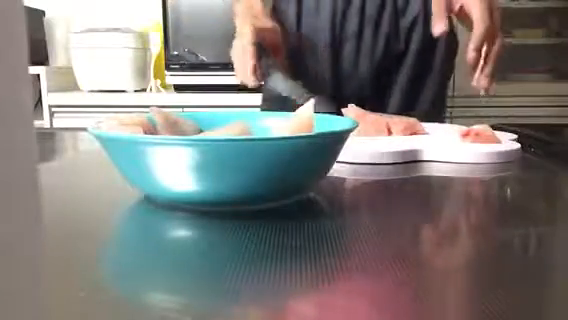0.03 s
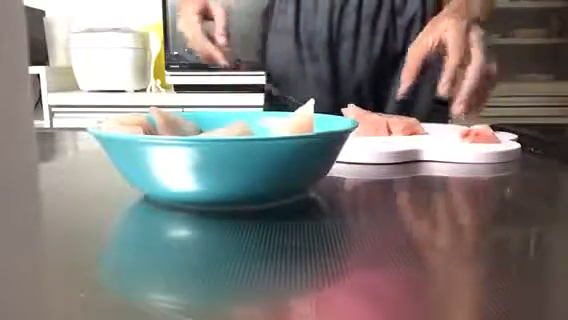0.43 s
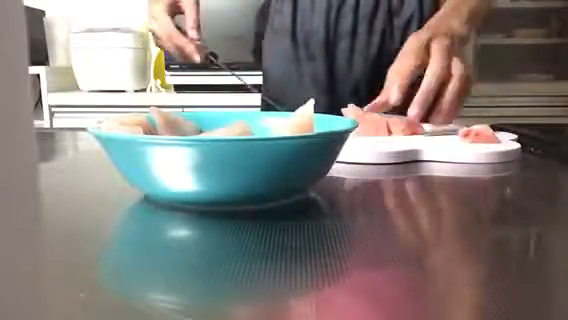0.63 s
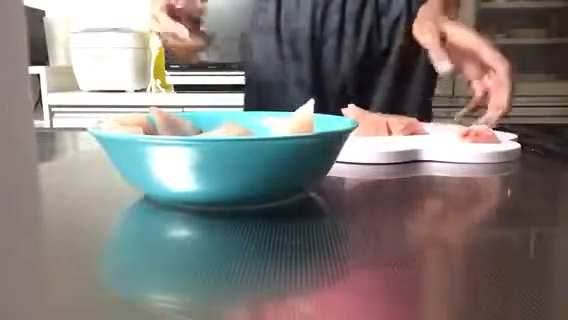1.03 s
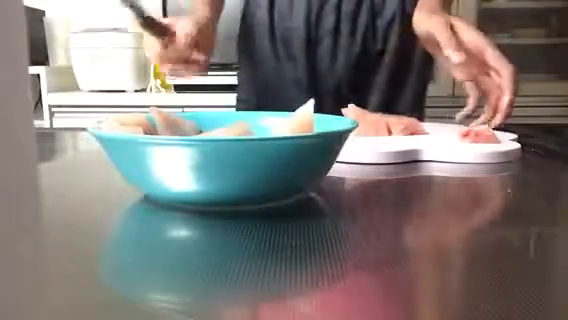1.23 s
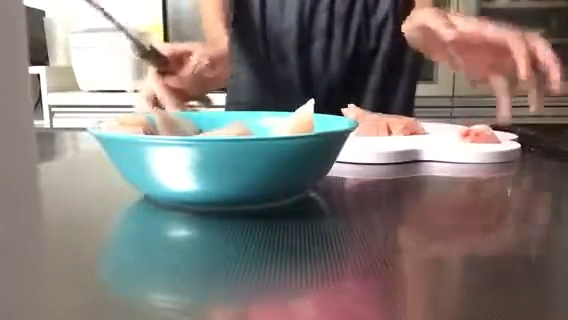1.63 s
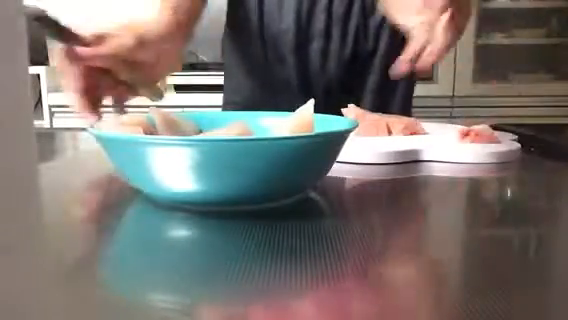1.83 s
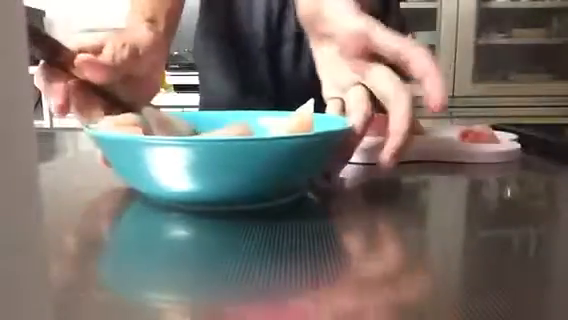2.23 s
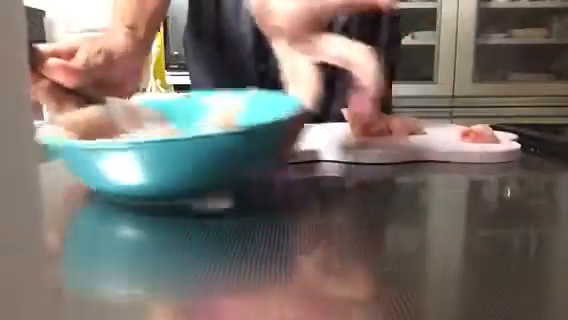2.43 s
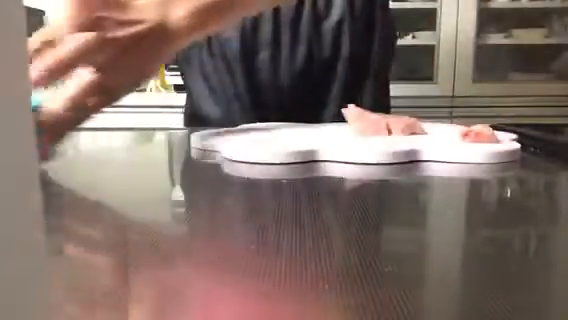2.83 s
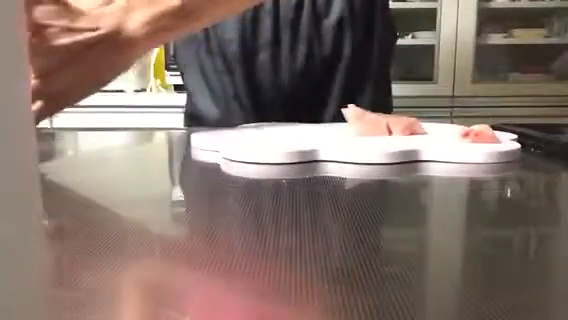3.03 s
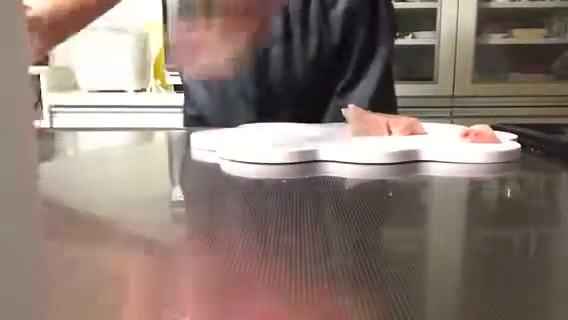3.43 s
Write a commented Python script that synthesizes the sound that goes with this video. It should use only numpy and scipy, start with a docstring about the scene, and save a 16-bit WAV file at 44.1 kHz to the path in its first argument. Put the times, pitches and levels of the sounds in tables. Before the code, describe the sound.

A bowl dragged across a kitchen counter is the main sound, heard close. At 0.1 seconds a knife clacks on a cutting board, ringing over a thud, then taps lightly at 0.6. Faint hand rustles follow, with a soft knock at 1.6. The bowl knocks at 2.4, then grinds, rumbles and groans along until a bump at 3.2. An appliance hums faintly throughout.

```python
"""Close on a kitchen counter, in a small hard room with an appliance humming behind.
A knife clacks down on a cutting board, its steel ringing over a thud, then the tip taps lightly.
Hands rustle and knock about softly. A filled bowl is gripped and dragged: its foot sticks and slips,
grinding and groaning while the counter drones underneath. Last, the bowl is set down with a bump."""
import sys
import numpy as np
from scipy import signal
from scipy.fft import rfft, irfft, next_fast_len
from scipy.io import wavfile
from scipy.ndimage import uniform_filter1d

SR = 44100
rng = np.random.default_rng(int(sys.argv[2]) if len(sys.argv) > 2 else 0)


def dump_mix(stems):
    """Bounce the given channels to the path in sys.argv[1] as a 16-bit WAV at rate SR."""
    frames = np.atleast_2d(stems).T  # one column per channel
    limited = np.clip(frames, -1, 1)  # hard clip at full scale
    pcm = np.round(limited * 32767).astype(np.int16)
    wavfile.write(sys.argv[1], SR, pcm)


N = 154350
TIME = np.arange(N) / SR

# fader curves of the drag's four layers, ahead of their trims: t/s, level/dB
GRIND_FADER = [(2.3, -75), (2.384, -59.5), (2.448, -55), (2.476, -45), (2.534, -48.5), (2.554, -39),
               (2.608, -48.5), (2.63, -41), (2.674, -48.5), (2.772, -40.5), (2.78, -41.5), (2.926, -48.5),
               (3.01, -43.5), (3.18, -59)]
DRONE_FADER = [(2.3, -64), (2.44, -42), (2.47, -38), (2.59, -42), (2.68, -36.5), (2.87, -41.5),
               (2.95, -36.5), (3.04, -34.5), (3.11, -37), (3.17, -54.5)]
RUMBLE_FADER = [(2.3, -58), (2.45, -56), (2.52, -39.5), (2.6, -34.5), (2.69, -37.5), (2.73, -63),
                (2.85, -50), (3.18, -66)]
GRIT_FADER = [(2.33, -93), (2.37, -67), (2.382, -54), (2.426, -59.5), (2.632, -59), (2.708, -41.5),
              (2.92, -49.5), (2.978, -57.5), (3.11, -60), (3.146, -56), (3.18, -55)]
# the bowl's foot catches in rasps and thin squeaks: t/s, length/s, relative level/dB
RASPS = [(2.5, 0.069, -55), (2.645, .04, -43), (2.715, .03, -40), (2.765, 0.034, -32.5),
         (3.005, 0.011, -38.5)]
SQUEAKS = [(2.55, 0.018, -67), (2.575, 0.0073, -50), (2.61, 0.01, -55)]
# the foot groans: t/s, length/s, f/Hz, level/dB
GROANS = [(2.69, .09, 222, -35), (2.76, .07, 440, -43), (2.82, .07, 530, -41), (2.945, .07, 560, -39),
          (3.04, .055, 316, -30)]
# echo from the counter's edge as the bowl travels: t/s, delay/s
EDGE_DELAY = [(2.45, .015), (2.66, .0082), (2.8, 0.0086), (2.93, .0124), (3.15, 0.017)]
# resonances of bowl, counter slab, squeaking foot and cutting board: f/Hz, width/Hz, gain/dB
BOWL_BODY = [(750, 50, -3), (914, 30, 0), (1160, 70, -8), (1352, 48, 4), (1572, 70, -2), (1777, 22, 1),
             (1935, 18, -5), (2130, 50, -13), (2660, 15, -10), (2858, 18, -11), (4477, 14, -16),
             (5340, 14, -15)]
SLAB_BODY = [(238.4, 53.4, -2), (308, 92.3, -1.5), (405, 96, -5.5), (546, 105, -8.5)]
SQUEAK_PEAK = [(6540, 120, 0)]
BOARD_BODY = [(587, 60, 0), (740, 70, -5.5), (1050, 180, -0.5), (1510, 210, -7)]
# hits of blade, knife tip, jolted board and small things touching: t/s, level/dB
BLADE_CLACKS = [(.131, -34.5), (.1365, -38), (.143, -57)]
TIP_TAPS = [(.575, -52.5), (.603, -55), (.655, -66.5)]
BOARD_JOLTS = [(.133, -44), (.15, -48), (.174, -48)]
TICKS = [(1.633, -52), (3.188, -53)]
# ring of the blade, the blade with its tip on the board, and the counter: f/Hz, gain/dB, t60/s
BLADE_MODES = [(2140, 1, .1), (2790, -2, .12), (3480, -2, .23), (4930, 2, .24), (6050, -4, .22),
               (6780, -2, .13), (7630, -4, .21), (8850, 0, .23), (10380, -2, .22), (11250, -3, .2),
               (11980, 1, .23), (13720, 3, .17), (15470, 1, .19)]
TIP_MODES = [(740, -3, .22), (1098, 2, .22), (1502, -3, .28), (2000, -6, .22), (2620, -1, .24),
             (3280, -3, .22), (4016, -1, .22), (4700, -1, .24), (5700, -1, .24), (6680, -1, .19),
             (7400, -3, .2), (8250, -3, .27), (9560, -2, .22), (11400, -4, .27), (12880, -3, .24)]
COUNTER_MODES = [(57.6, -23.5, .33), (105.7, -10, 0.21), (241, -15, 0.18), (333.3, -22.5, 0.14),
                 (603.5, -18.5, 0.05)]
# knocks on the counter: t/s, thud level/dB, f/Hz, t60/s, click level/dB
KNOCKS = [(.137, -30, 224.5, 0.14, -41.5), (.151, -14.5, 147, 0.034, -58), (0.178, -28, 103, 0.11, -52.5),
          (.186, -36, 274, 0.11, -54), (1.625, -41.5, 208, 0.052, -62.5), (1.632, -43.5, 440, 0.036, -59),
          (1.638, -29, 126, 0.043, -70), (2.328, -33.5, 197, 0.043, -83), (2.381, -17.5, 205, 0.031, -45.5),
          (2.397, -21, 212, 0.035, -56), (3.19, -19, 254, 0.053, -36.5)]
# faint rustles of hands and food, dull shuffles of the cook: t/s, length/s, level/dB
RUSTLES = [(.02, 0.6, -71), (1.095, 0.063, -73.5), (1.25, 0.13, -72.5), (1.39, 0.023, -73.5),
           (1.53, 0.21, -78.5), (2.365, 0.041, -70.5), (3.47, 0.13, -77)]
SHUFFLES = [(1.24, 0.035, -58), (1.36, 0.07, -56), (1.48, .1, -77), (2.16, 0.11, -68), (2.28, 0.083, -59.5),
            (3.42, 0.37, -59.5)]
# EQ curves of the noise layers: f/Hz, gain/dB
RUMBLE_EQ = [(30, -36), (60, -5), (80, -19), (120, 0.5), (190, -3), (300, -16.5), (700, -62)]
GRIT_EQ = [(300, -36), (900, 7.5), (2300, 1.5), (4000, -1.5), (6000, -5.5), (8500, -4.5), (10000, -7),
           (11400, -3.5), (15500, -8)]
CLICK_EQ = [(100, -10), (400, 16), (1400, -2.5), (2300, -1), (7000, -8), (15000, -6.5)]
RUSTLE_EQ = [(150, 17), (700, 11.5), (2000, 3), (7000, -2), (11500, 6), (15500, -1.5)]
SHUFFLE_EQ = [(60, -20), (130, 13), (300, 8), (450, -16), (800, -11.5), (2000, -32.5)]
ROOM_TONE_EQ = [(15, -39), (25, -26), (55, -4.5), (86, -17.5), (123, -4.5), (299, -10), (324, -20.5),
                (352, -13.5), (382, -19), (654, -24), (1040, -34.5), (1120, -33.5), (15800, -48)]
# the kitchen's reverb time: f/Hz, t60/s
ROOM_DECAY = [(100, 0.32), (400, 0.42), (2000, 0.34), (6000, 0.36), (15000, 0.29)]
# the appliance's partials: f/Hz, level/dB
HUM_PARTIALS = [(59.5, -73.5), (119.5, -67.5), (239, -76.5)]


def bowl_drag(judder_db=1, grind_db=-4.5, rasp_db=-2.5, drone_db=1, rumble_db=2.5, grit_db=2.5):
    """The bowl's foot judders over the counter and shakes both the bowl and the slab."""
    force = friction() * amp(judder_db * wobble(70))
    grind_gain = fader(GRIND_FADER, grind_db) + amp(rasp_db) * swells(RASPS)
    grind = grind_gain * resonate(force, BOWL_BODY)
    slab = resonate(edge_echo(friction()), SLAB_BODY)
    drone = fader(DRONE_FADER, drone_db) * eq(slab, [(80, 3), (200, 4), (600, -4.5), (1200, -2.5)])
    rumble = fader(RUMBLE_FADER, rumble_db) * eq(edge_echo(friction()), RUMBLE_EQ)
    grit = fader(GRIT_FADER, grit_db) * eq(contact_flicker(force), GRIT_EQ)
    squeaks = swells(SQUEAKS) * resonate(noise(), SQUEAK_PEAK)
    return grind + drone + rumble + grit + squeaks


def friction(slips_per_s=1100, spread_db=4.5, rub_gain=0.76):
    """Tiny slips of uneven size crackle over a smooth rub."""
    slips = (rng.random(N) < slips_per_s / SR) * np.sign(noise())
    return unit_rms(slips * amp(spread_db * noise())) + rub_gain * noise()


def edge_echo(x, gain=0.34):
    """The wave returning from the counter's edge: a comb that sweeps as the bowl travels."""
    delay = np.interp(TIME, *np.transpose(EDGE_DELAY))
    return unit_rms(x + gain * np.interp(TIME - delay, TIME, x))


def contact_flicker(x, depth_db=4.5, frames=7):
    """Narrow bands flare and fade as the foot's contact points change."""
    bands = signal.stft(x, nperseg=512)[2]
    drift = uniform_filter1d(rng.standard_normal(bands.shape), frames, axis=1)
    drift = uniform_filter1d(drift, frames, axis=1)
    drift = unit_rms(uniform_filter1d(drift, 2, axis=0))
    return unit_rms(signal.istft(bands * amp(depth_db * drift), nperseg=512)[1][:N])


def bowl_groans(sag_octaves_per_s=.7, jitter=0.0294):
    """The foot briefly sticks and slips in rhythm: rough tones that sag as the bowl slides on."""
    out = np.zeros(N)
    for s, length, hz, db in GROANS:
        pitch = hz * 2 ** (-sag_octaves_per_s * (TIME - s)) * (1 + jitter * wobble(200))
        out += swells([(s, length, db)]) * np.sin(2 * np.pi * np.cumsum(pitch) / SR)
    return out


def knife(hits, modes, crack_db, crack_t60, waver):
    """Steel cracks, damped while it touches, then rings on and wavers in the grip."""
    out, t = np.zeros(N), TIME[:SR // 2]
    ring_norm = np.linalg.norm([amp(level) for _, level, _ in modes])
    damped = resonate(noise(), [(hz, 200 * np.sqrt(hz / 5000), level) for hz, level, _ in modes])
    for s, db in hits:
        ring = np.zeros(len(t))
        for hz, level, t60 in modes:
            envelope = decay(t, t60, level + rng.normal(0, 1))
            drift = waver * np.sqrt(hz / 5000 / SR) * np.cumsum(rng.standard_normal(len(t)))
            ring += envelope * np.sin(2 * np.pi * hz * t + drift)
        crack = random_slice(damped, len(t)) * decay(t, crack_t60, crack_db)
        add(out, s, amp(db) * (ring / ring_norm + crack))
    return out


def counter_knocks(thud_rise_s=0.00059, boom_rise_s=0.016, boom_db_per_octave=-4, click_t60=0.12):
    """A click that stirs the bowl, a short low thud, and the counter's boom blooming after it."""
    out, t = np.zeros(N), TIME[:SR // 2]
    contact = eq(noise(), CLICK_EQ) + amp(-6.5) * resonate(noise(), BOWL_BODY)
    for s, db, hz, t60, click_db in KNOCKS:
        thud = -np.sin(2 * np.pi * hz * t) * decay(t, t60) * (1 - np.exp(-t / thud_rise_s))
        boom = sum(decay(t, mode_t60, level) * np.sin(2 * np.pi * (f * t + rng.random()))
                   for f, level, mode_t60 in COUNTER_MODES)
        boom *= 1 - np.exp(-t / boom_rise_s)
        boom *= amp(boom_db_per_octave * np.log2(hz / 190))  # lower knocks boom more
        click = random_slice(contact, len(t)) * decay(t, click_t60, click_db)
        add(out, s, amp(db) * (thud + boom) + click)
    return out


def board_clonks():
    """Jolted by the knife, the cutting board gives hollow clonks."""
    return bursts(BOARD_JOLTS, t60=0.065) * resonate(noise(), BOARD_BODY)


def ticks():
    """Small bright transients as things touch."""
    return bursts(TICKS, t60=0.013) * noise()


def hands():
    """Soft grainy handling and the dull shuffle of the cook moving."""
    return swells(RUSTLES) * eq(friction(), RUSTLE_EQ) + swells(SHUFFLES) * eq(noise(), SHUFFLE_EQ)


def kitchen_reverb(x, predelay_s=.006, bass_db=-4, blocks=40):
    """A short tail that changes as things move; each frequency dies at its own speed."""
    wet, hop = np.zeros(N), N // blocks
    for start in range(0, N, hop):
        hz, t, bands = signal.stft(rng.standard_normal(SR // 2), SR, nperseg=256)
        tail = signal.istft(bands * decay(t, curve_at(ROOM_DECAY, hz)[:, None]), SR, nperseg=256)[1]
        add(wet, start / SR, signal.fftconvolve(x[start:start + hop], tail / np.linalg.norm(tail)))
    shelf = [(200, bass_db), (700, 0)]
    return filtered(wet, lambda f: amp(curve_at(shelf, f)) * np.exp(-2j * np.pi * f * predelay_s))


def background(room_tone_db=-61):
    """An appliance's gently wavering hum on a bed of low room tone and hiss."""
    hum = sum(amp(db) * np.sqrt(2) * np.sin(2 * np.pi * hz * TIME + .5 * wobble(2.2))
              for hz, db in HUM_PARTIALS)
    return hum + amp(room_tone_db) * eq(noise(), ROOM_TONE_EQ)


def amp(db):
    """Gain of a level in dB."""
    return 10 ** (np.asarray(db) / 20)


def unit_rms(x):
    """x at rms 1."""
    return x / np.sqrt(np.mean(x ** 2) + 1e-20)


def curve_at(points, hz):
    """A curve of (f/Hz, value) points, read on a log axis."""
    f, values = np.transpose(points)
    return np.interp(np.log(hz + 1), np.log(f + 1), values)


def filtered(x, response):
    """x through a frequency response."""
    size = next_fast_len(N + SR // 2)
    return irfft(rfft(x, size) * response(np.fft.rfftfreq(size, 1 / SR)), size)[:N]


def eq(x, curve):
    """x through an EQ curve, at rms 1."""
    return unit_rms(filtered(x, lambda hz: amp(curve_at(curve, hz))))


def resonate(x, peaks):
    """x through parallel resonators of alternating polarity, at rms 1."""
    def response(f):
        return sum((-1) ** k * amp(db) * 1j * f * width / (hz * hz - f * f + 1j * f * width)
                   for k, (hz, width, db) in enumerate(peaks))
    return unit_rms(filtered(x, response))


def noise():
    """Fresh white noise."""
    return rng.standard_normal(N)


def random_slice(x, length):
    """A stretch of looped x from a random start."""
    return np.roll(x, rng.integers(N))[:length]


def wobble(knots_per_s):
    """A gliding random modulator."""
    return np.interp(TIME * knots_per_s, np.arange(4096), rng.standard_normal(4096))


def add(out, s, sound):
    """Mix a sound in at time s."""
    part = out[round(s * SR):][:len(sound)]
    part += sound[:len(part)]


def decay(t, t60, db=0):
    """An envelope falling from db by 60 dB every t60 seconds."""
    return amp(db - 60 * t / t60)


def bursts(hits, t60):
    """An envelope of hard attacks that die away."""
    return sum((TIME >= s) * decay(np.abs(TIME - s), t60, db) for s, db in hits)


def swells(rows):
    """An envelope of smooth bumps."""
    return sum(amp(db) * np.exp(-(2 * (TIME - s) / length) ** 2) for s, length, db in rows)


def fader(points, trim_db, release_t60=.06):
    """Gain riding a fader curve plus a trim, fading out beyond both ends."""
    s, db = np.transpose(points)
    outside_s = np.maximum(s[0] - TIME, 0) + np.maximum(TIME - s[-1], 0)
    return decay(outside_s, release_t60, np.interp(TIME, s, db) + trim_db)


def scene(reverb_db=-5.5):
    """The close action on the counter, its reverb and the background bed."""
    clack = knife(BLADE_CLACKS, BLADE_MODES, crack_db=2, crack_t60=0.073, waver=21)
    taps = knife(TIP_TAPS, TIP_MODES, crack_db=-4.5, crack_t60=0.17, waver=20.7)
    impacts = clack + taps + counter_knocks() + board_clonks() + ticks()
    close = impacts + bowl_drag() + bowl_groans() + hands()
    return (close + amp(reverb_db) * kitchen_reverb(close) + background())[None]


def record(dry, low_cut_hz=42, top_hz=15800):
    """The microphone loses the deep bass and keeps nothing above its band limit."""
    low_cut = signal.butter(5, low_cut_hz, "highpass", fs=SR, output="sos")
    return filtered(signal.sosfilt(low_cut, dry[0]), lambda hz: hz < top_hz)[None]


dry = scene()
out = record(dry)
dump_mix(out)
```